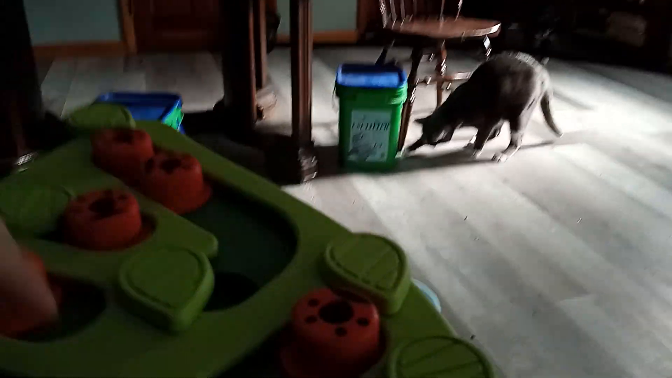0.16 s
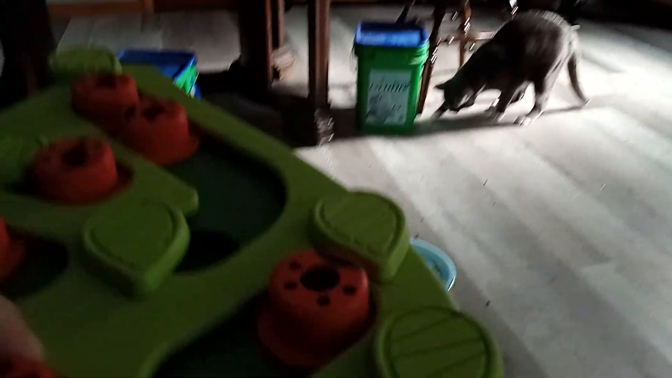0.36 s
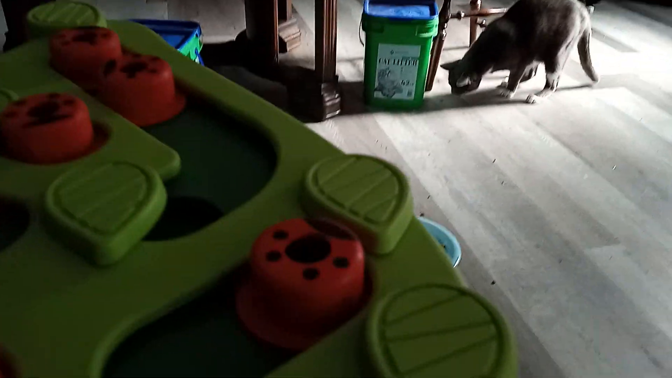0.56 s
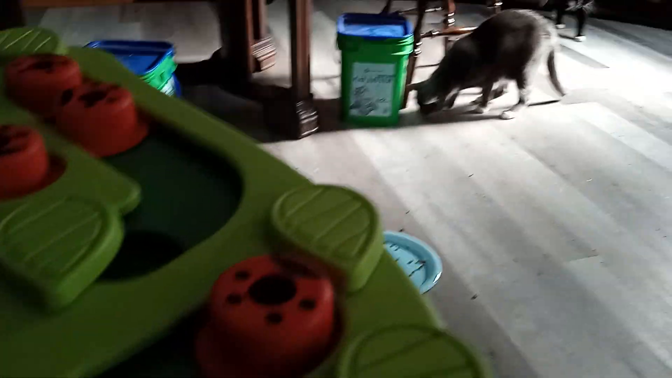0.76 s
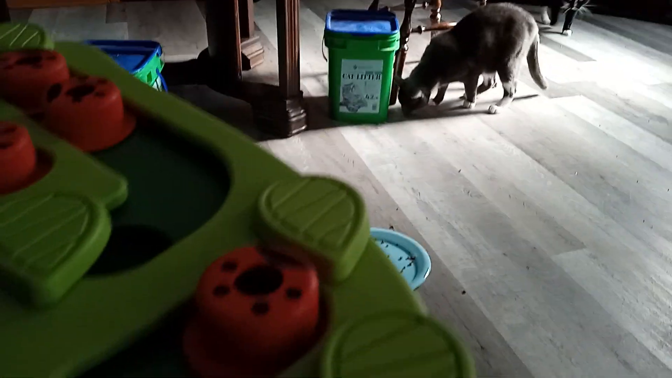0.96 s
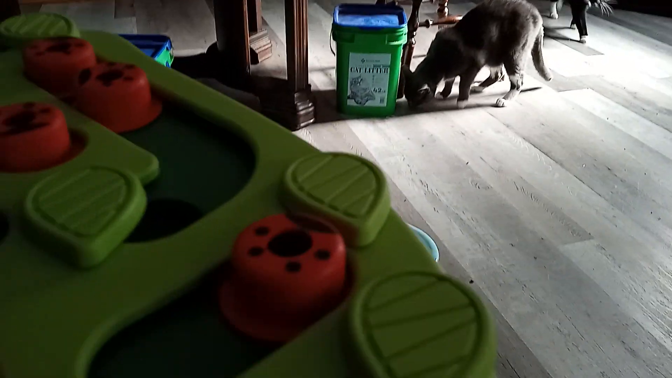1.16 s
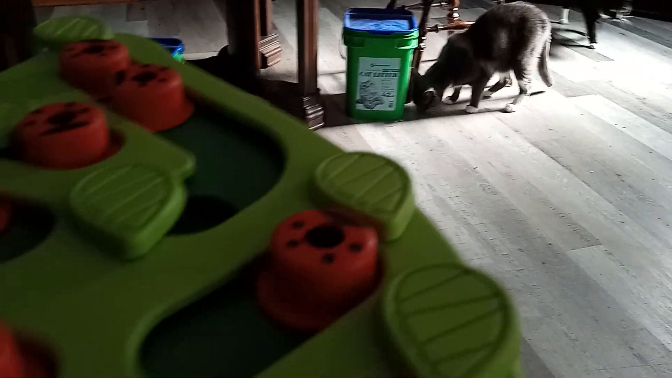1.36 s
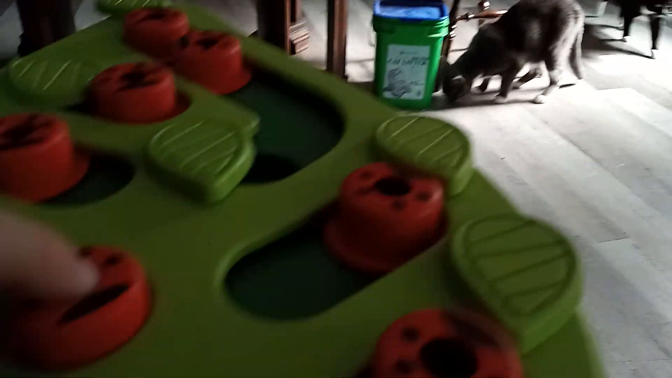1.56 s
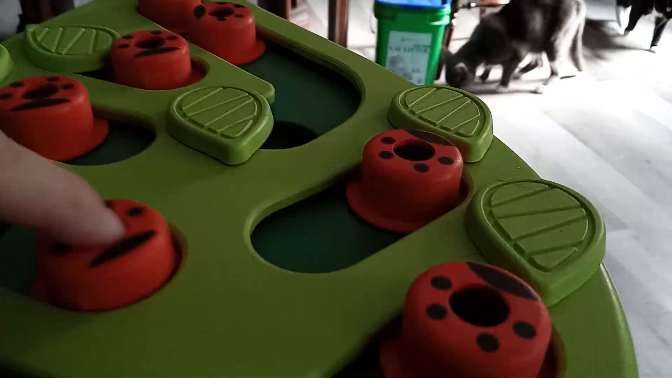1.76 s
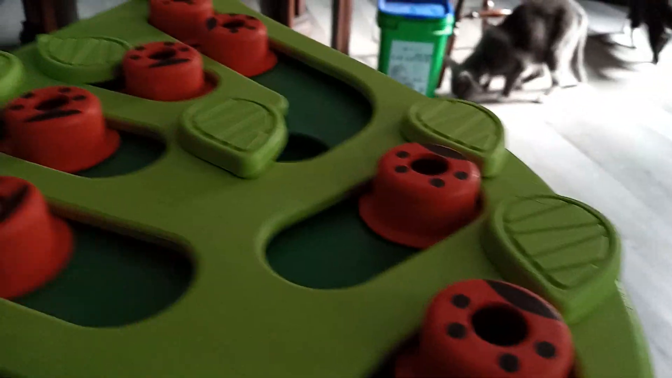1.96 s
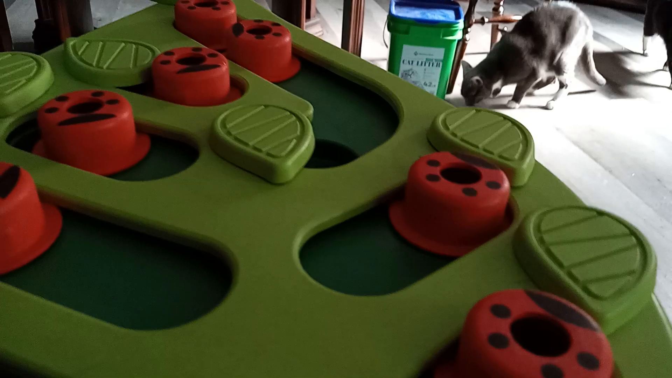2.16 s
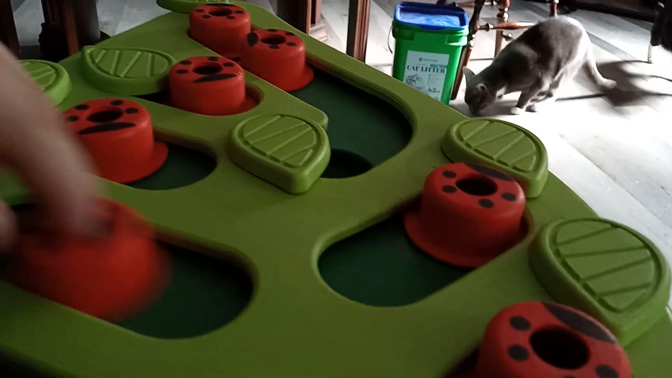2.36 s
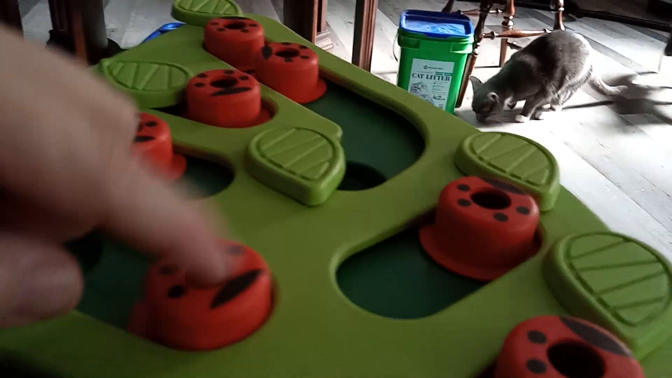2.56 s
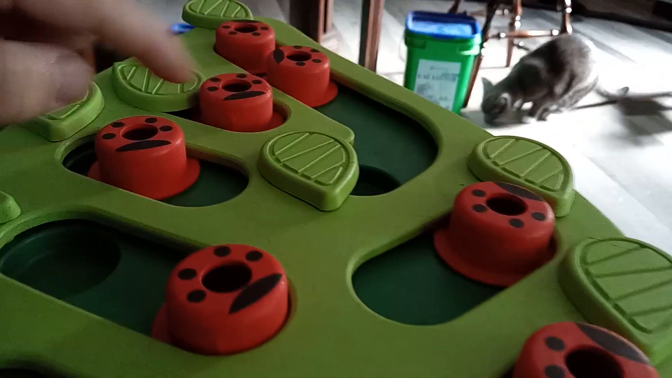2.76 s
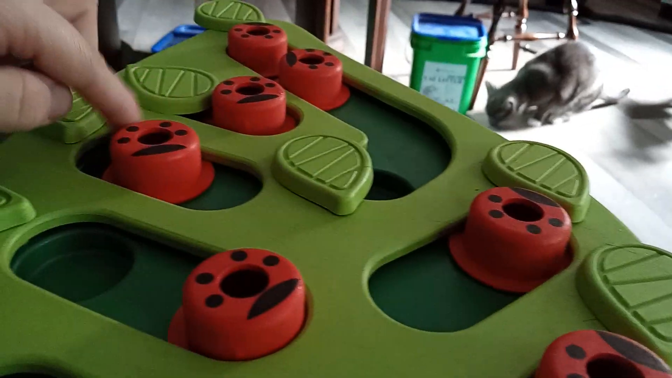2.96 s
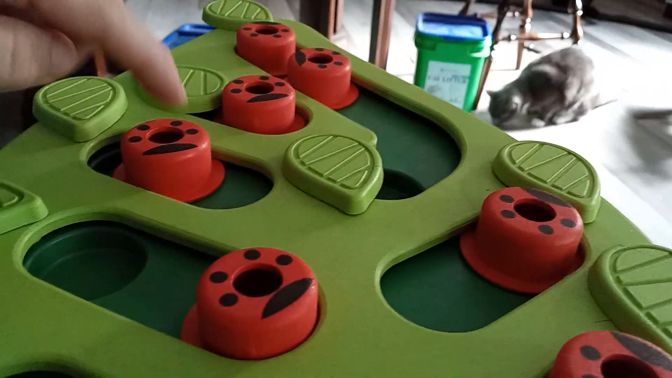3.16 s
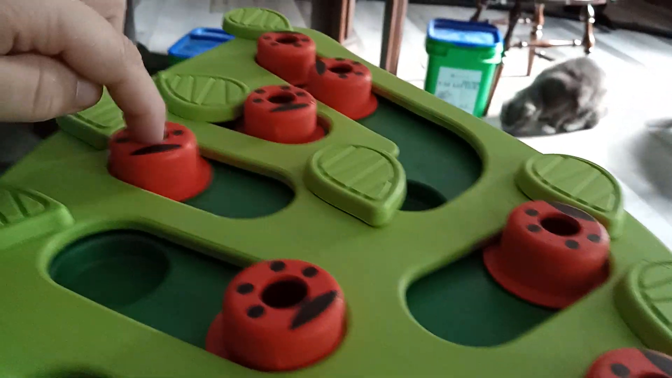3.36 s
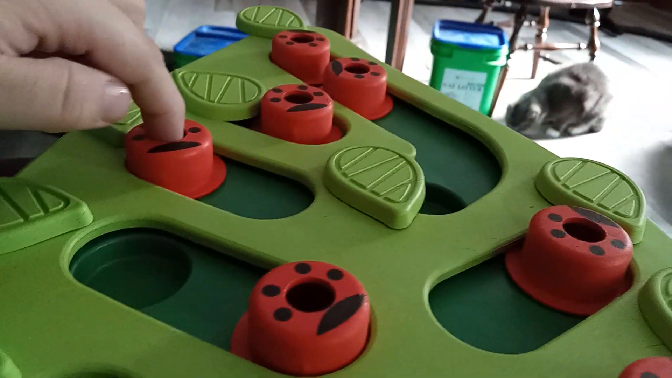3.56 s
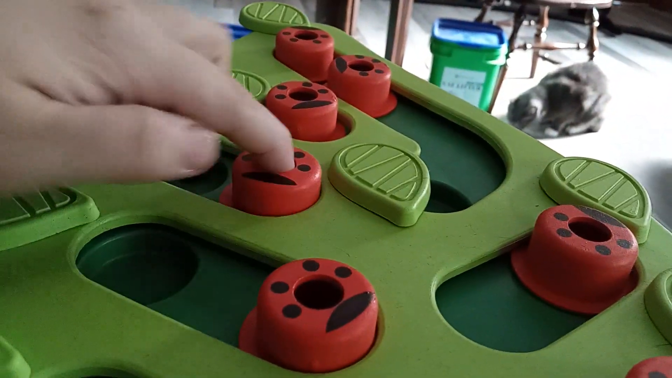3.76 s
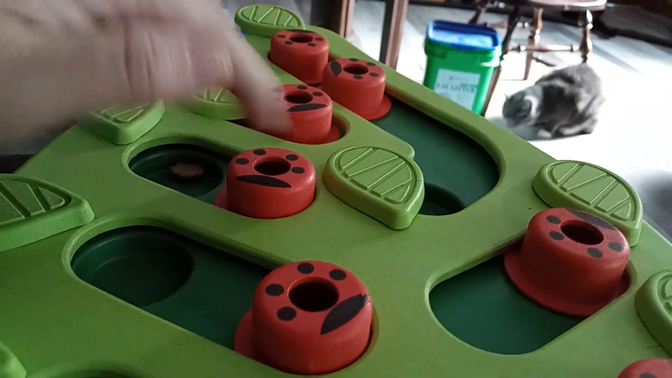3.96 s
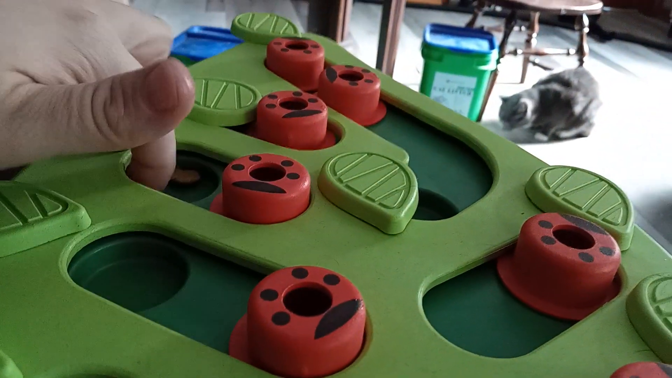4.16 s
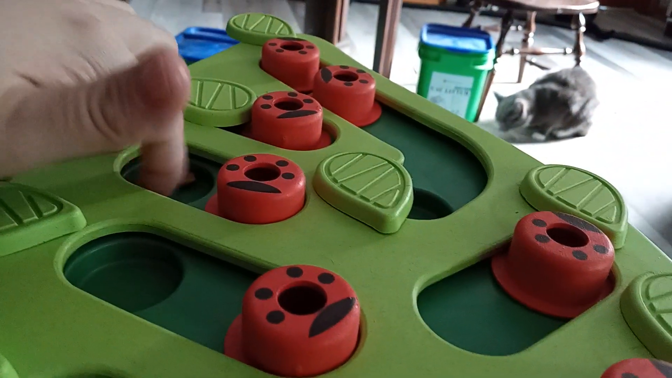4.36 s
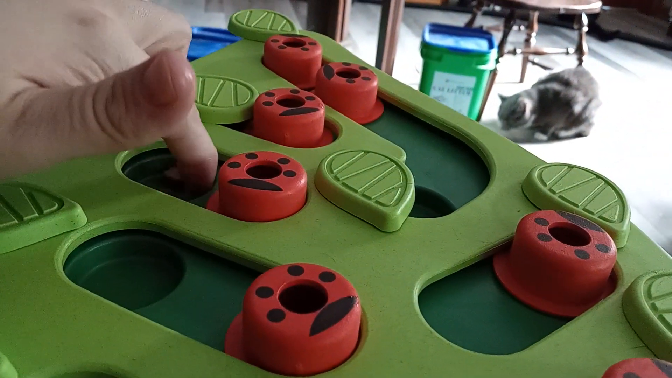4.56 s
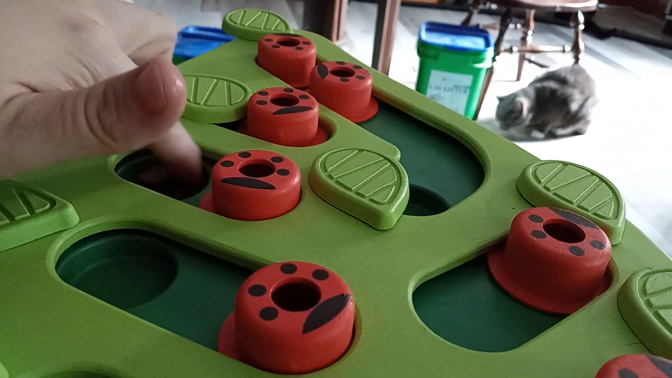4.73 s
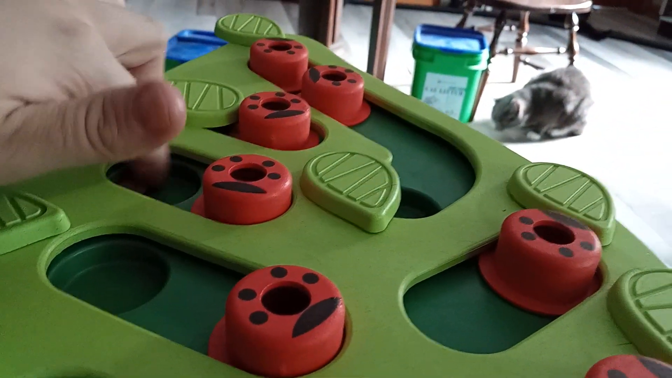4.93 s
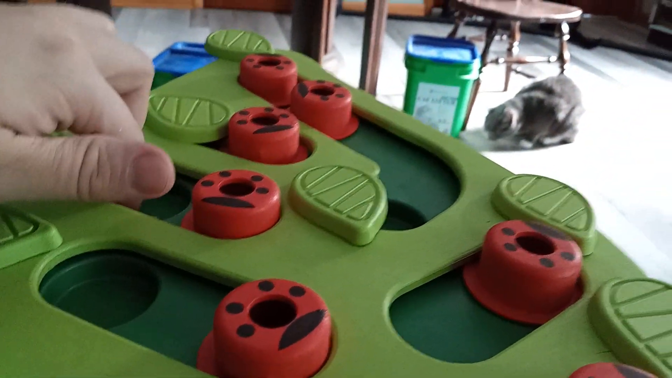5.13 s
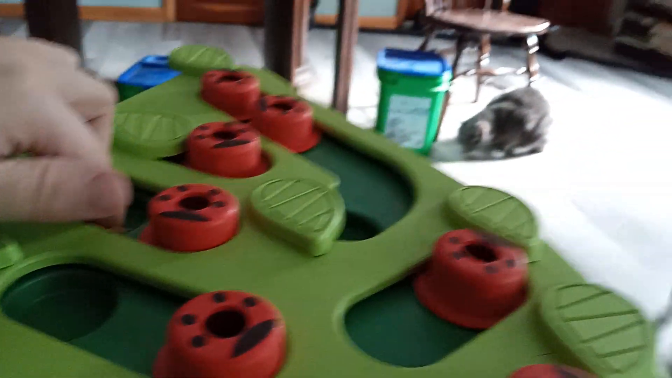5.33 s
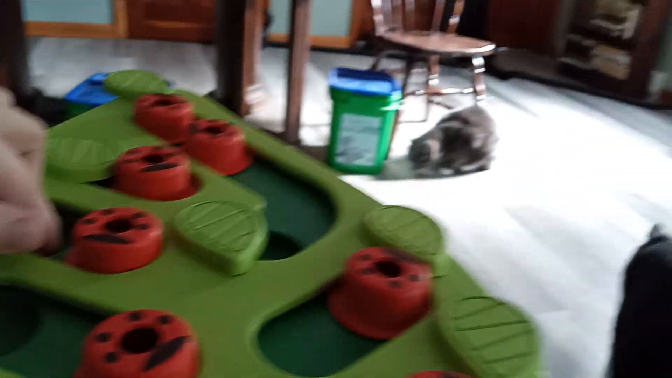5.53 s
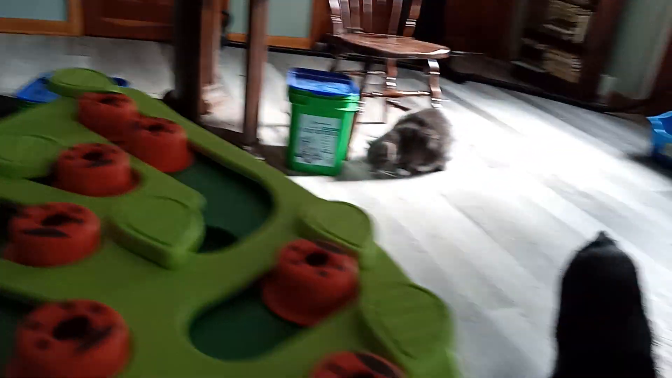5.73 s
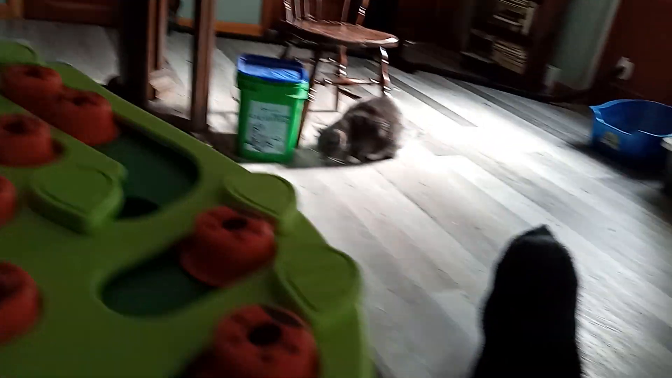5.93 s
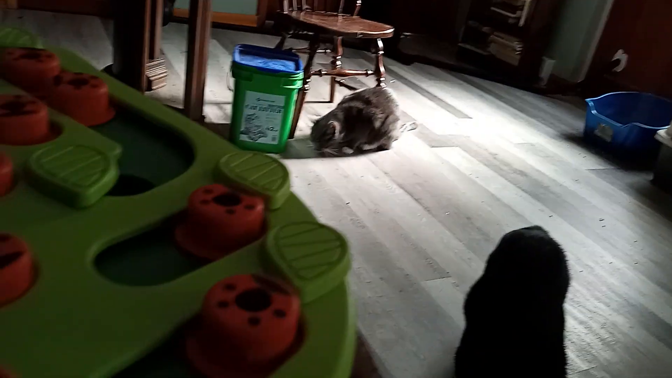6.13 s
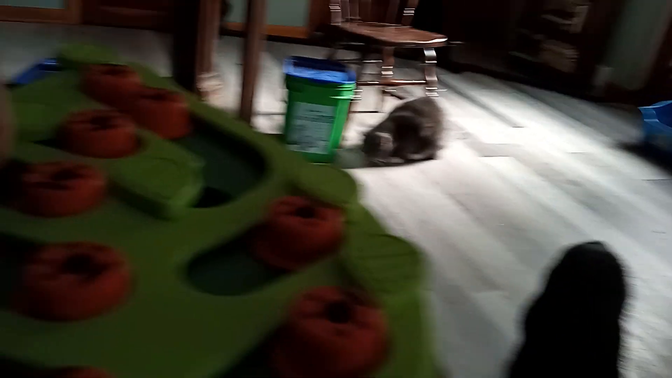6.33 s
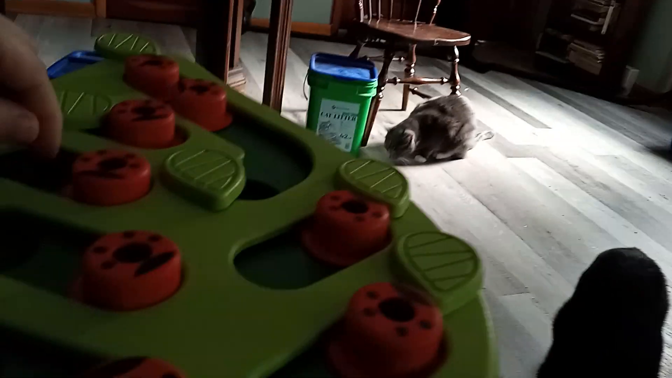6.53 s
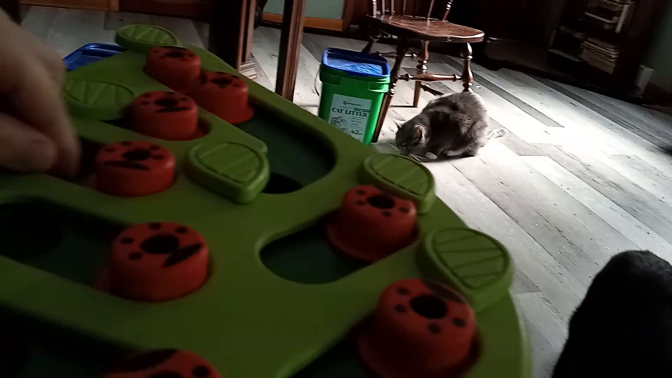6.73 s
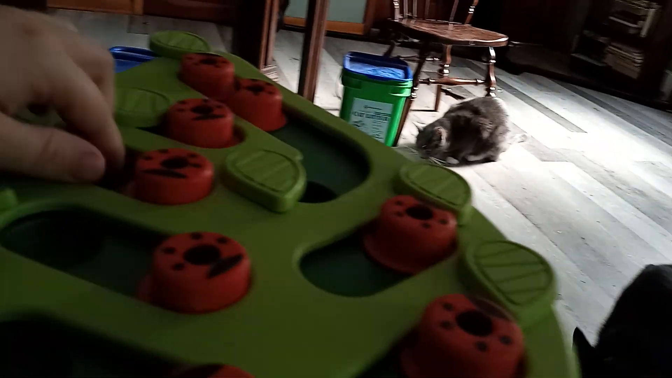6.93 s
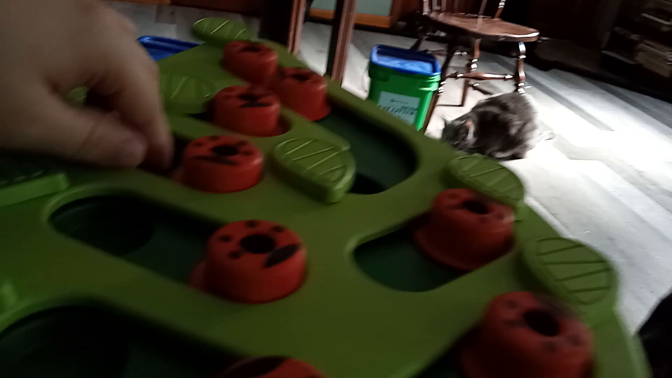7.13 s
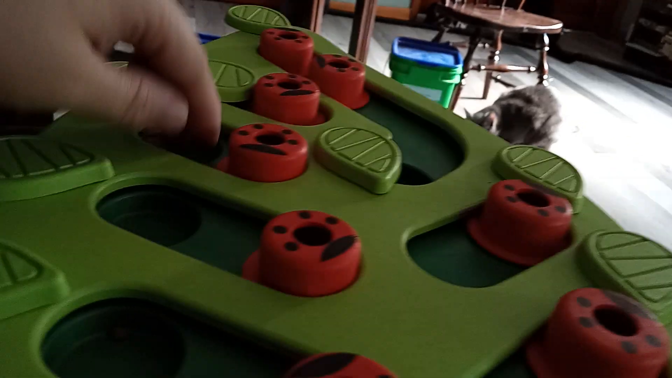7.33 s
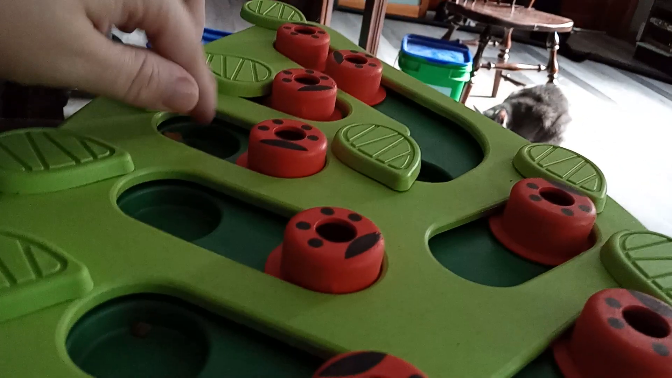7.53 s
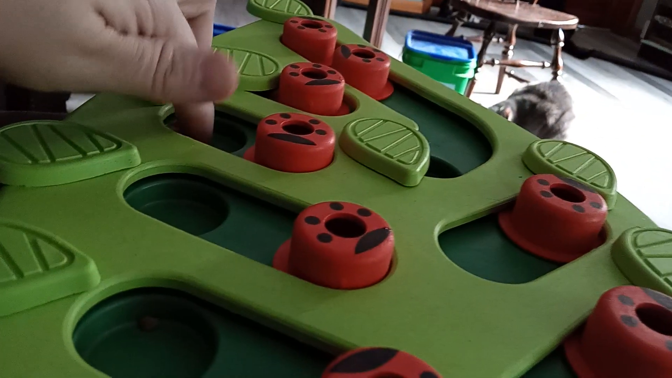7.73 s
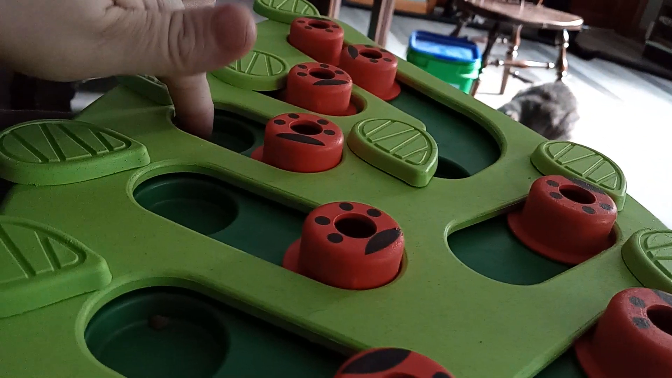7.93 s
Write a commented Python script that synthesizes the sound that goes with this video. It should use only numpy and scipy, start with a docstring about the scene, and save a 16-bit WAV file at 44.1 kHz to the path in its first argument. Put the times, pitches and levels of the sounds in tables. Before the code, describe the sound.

A close stereo microphone in a small room picks up a plastic pet puzzle tray, slightly to the left, over a faint low electrical hum, rumble and hiss. From about 0.4 to 1.5 seconds, light clicks and short scrapes come irregularly, with a sharper clack near 1.0. From 1.55 to 2.7, hollow cups slide more loudly, rasping higher as they speed up and knocking the slot ends, with a hard clack near 2.7. After a near pause come small taps around 3.0, then strong scrapes and rebounding knocks from 3.4 to 4.05. A dull finger thump and brief scrape follow at 4.25. From 4.5 to 5.6, a fingertip rubs softly and drily. It is mostly quiet until 6.5, when a small hard piece ticks and bounces amid rubbing until 6.8. Further rubs, ticks and a light knock occur around 7.0-7.4 and 7.7-7.85, then hum remains until 8.

```python
"""In a small room, close to the microphone and a little to its left, a hand works a pet's plastic puzzle tray.
Hollow cups slide along slots: each push speeds up and slows, scraping by uneven slips under moving filters.
Cups knock the slot ends and rebound, and a finger thumps the tray, as force bursts ring the plastic. Then a
finger rubs, mostly in an uncovered well, where something small and hard, probably a treat, ticks and bounces.
Decaying noise answers as the room, over a low electrical hum, rumble and faint hiss."""
import sys
import numpy as np
from scipy import signal
from scipy.fft import rfft, irfft, next_fast_len
from scipy.io import wavfile
from scipy.ndimage import uniform_filter1d, map_coordinates

SR = 44100
rng = np.random.default_rng(int(sys.argv[2]) if len(sys.argv) > 2 else 0)


def wav_out(sig):
    """Save sig, one row per channel (or a flat mono array), as 16-bit PCM at SR to the path in sys.argv[1]."""
    wavfile.write(sys.argv[1], SR, np.round(np.clip(np.atleast_2d(sig).T, -1, 1) * 32767).astype(np.int16))


N = 352359  # length in samples

# Levels of the four contact tables are taken before the mix in scene().
# Pushes of a cup. Each row: start in seconds, speeding up in seconds, slowing down in seconds,
# level at top speed in dB, swell in dB, bass and treble in dB (a shared offset is added), ring of the cup in Hz.
CUP_PUSHES = [(0.358, 0.025, 0.03, -42.5, 18, -22.5, -15.5, 1180),
              (0.47, 0.038, 0.043, -51.5, 6, -19.5, -4.5, 1130),
              (0.956, 0.021, 0.014, -39, 17.5, -13, -18.5, 1260),
              (1.185, 0.063, 0.036, -45, 15, -7.5, -15.5, 1280),
              (1.335, 0.012, 0.018, -49.5, 9, 3, -25, 1250),
              (1.42, 0.044, 0.042, -52.5, 11, -7.5, -22.5, 875),
              (1.538, 0.021, 0.0072, -46.5, 21, -10, -21, 1030),
              (1.563, 0.038, 0.016, -35, 4.5, -12.5, -17, 1370),
              (1.867, 0.11, 0.13, -29.5, 9, -19, -13.5, 1484),
              (2.083, 0.067, 0.044, -35.5, 3, -22, -15, 1301),
              (2.351, 0.022, 0.05, -31.5, 7, -17.5, -22.5, 1040),
              (2.405, 0.065, 0.14, -31, 13, -23, -9, 1400),
              (2.98, 0.027, 0.027, -65, 8.5, -18, -13.5, 1030),
              (3.044, 0.02, 0.04, -53.5, 7, -19, -13.5, 899.6),
              (3.384, 0.096, 0.014, -29, 9, -28.5, -16, 1540),
              (3.689, 0.024, 0.02, -41.5, 7, -13.5, -25, 941),
              (3.725, 0.1, 0.046, -28.5, 12, -25, -12, 1390),
              (4.255, 0.008, 0.059, -48.5, 12, -8, -10, 1100)]
# Cups hitting the tray, and near 4.25 s a finger thumping it. Each row: time in seconds, level in dB,
# thump in dB, hardness in dB, chatter in dB, ring of the struck spot in Hz,
# flight before the first rebound in seconds (0 for no rebound).
TRAY_KNOCKS = [(0.3809, -42.5, -1.5, 0, 22, 810, 0.002), (0.4959, -46.5, 4, -12, 5, 1160, 0.0025),
               (0.6956, -44.5, 8, 1.5, -6.5, 765, 0.0078), (0.772, -60, 11, -24.5, 5, 1940, 0),
               (0.8125, -48.5, 0, -16, 5.5, 1820, 0.000039), (0.8235, -57, 10, -4, 1.5, 450, 0.00015),
               (0.8707, -35.5, -12, 7.5, -18, 1700, 0.000085), (0.9626, -50, 3, 0.5, -0.5, 1250, 0),
               (0.981, -32, 3, 9, -9.5, 2800, 0.0012), (1.0666, -45, 4, -5, -3, 800, 0.00084),
               (1.1726, -42, 1, 3, -11.5, 3060, 0.0004), (1.2486, -40.5, -3.5, -1, -8, 1240, 0.00046),
               (1.3466, -43.5, 8.5, -3.5, 0, 430, 0), (1.5609, -40, -11.5, 1, -11.5, 1277, 0),
               (1.6114, -29, -3, 10, -4, 2700, 0.0018), (1.8853, -38, -1, -3, 7, 945, 0.00099),
               (1.9485, -31, 0, -12, 10.5, 1235, 0.0021), (1.9754, -33, -2, -7.5, -5.5, 1740, 0.0015),
               (2.1736, -36.5, 4, 5, -1, 1550, 0.013), (2.3333, -32.5, 4.5, -4, -14, 1300, 0),
               (2.3569, -36.5, 4.5, -6, 2.5, 989, 0.00094), (2.6113, -31, -4, 3.5, -4, 2000, 0),
               (2.6363, -34.5, -3, 9.5, 1, 1090, 0.00019), (2.6736, -25.5, -0.5, 6.5, 2.5, 2110, 0.0096),
               (3.012, -52, 1.5, -16, 7.5, 964, 0.0011), (3.0427, -38.5, -9.5, -2.5, -2.5, 1050, 0.00029),
               (3.092, -58.5, -5, 6, -3, 930, 0), (3.3863, -33.5, -1, 8, -11, 1778, 0.0016),
               (3.4772, -27, 1.5, 12.5, 4, 1630, 0.0064), (3.4944, -32.5, 1, 14, -3, 1776, 0.0013),
               (3.6951, -41, -6, -11, -7, 870, 0), (3.7162, -34, 1, 1.5, -3, 1410, 0),
               (3.78, -32, -12, 0, -3.5, 1902, 0.00033), (3.8577, -28, -12.5, -4, 0, 2266, 0.0014),
               (3.8729, -31, 7, 10.5, 15.5, 1200, 0.00016), (3.9416, -50, -5.5, 3.5, -1.5, 897, 0.00044),
               (3.9629, -45.5, -7, 0, 6.5, 2470, 0.000074), (4.0246, -29.5, -14, 13, -8, 1420, 0.00047),
               (4.0274, -29, 3, 9, 8, 1499, 0.022), (4.2477, -43, 20, 24, 1.5, 1830, 0.0012),
               (4.2514, -35.5, 7, -11, 0.5, 300, 0.0008), (4.259, -41.5, 6.5, -7, 6, 1488, 0),
               (7.0452, -34.5, 0.5, 2.5, 2.5, 990, 0), (7.7221, -44.5, -10.5, 8, 4, 722, 0.0019),
               (7.8351, -52, -19, -5, 6, 863, 0.00065)]
# Strokes of the finger, mostly in the well. Each row: start in seconds, speeding up in seconds,
# slowing down in seconds, level at top speed in dB, treble in dB (a shared offset is added).
FINGER_STROKES = [(0.0, 0.033, 0.28, -75.5, 0), (0.325, 0.018, 0.03, -71, 10),
                  (3.347, 0.014, 0.026, -73, 8), (4.457, 0.034, 0.024, -57, 6.5),
                  (4.733, 0.014, 0.057, -58.5, -9), (4.815, 0.028, 0.045, -55.5, -10),
                  (4.938, 0.011, 0.07, -56, -14), (4.97, 0.112, 0.138, -51.5, -3.5),
                  (5.175, 0.027, 0.049, -59, -13), (5.29, 0.02, 0.04, -62.5, -11.5),
                  (5.24, 0.028, 0.035, -51, -10), (5.341, 0.028, 0.044, -55.5, -2.5),
                  (5.464, 0.024, 0.045, -58, -15), (5.549, 0.012, 0.02, -64.5, 5.5),
                  (5.755, 0.01, 0.025, -66.5, -12), (6.05, 0.016, 0.014, -65.5, -7),
                  (6.588, 0.0075, 0.05, -57, 6), (6.645, 0.02, 0.073, -54.5, -4.5),
                  (6.72, 0.019, 0.046, -53, -11), (7.026, 0.02, 0.02, -48, 4),
                  (7.07, 0.043, 0.05, -53.5, -2.5), (7.168, 0.012, 0.024, -46.5, -17),
                  (7.209, 0.066, 0.044, -52.5, -9), (7.352, 0.023, 0.059, -57, -13),
                  (7.735, 0.022, 0.05, -54.5, -3), (7.775, 0.031, 0.017, -54.5, -4)]
# A small hard piece dropping or tipping in the well. Each row: time in seconds, level in dB, thump in dB,
# hardness in dB, ring of the struck spot in Hz, number of bounces, first flight in seconds.
PIECE_TICKS = [(4.7454, -62, -10, -11, 1830, 0, 0), (5.5597, -65.5, -10, 4, 3370, 1, 0.006),
               (5.7174, -62.5, -5, -2, 2750, 1, 0.006), (6.112, -61, 2.5, 7, 3016, 0, 0),
               (6.5411, -40, -4, 5, 1693, 0, 0), (6.5628, -45.5, -14, 13, 3420, 0, 0),
               (6.5764, -40, -13, 8.5, 1780, 2, 0.0093), (6.6465, -54, -5, 16, 1830, 0, 0),
               (6.6603, -49, -3, 0, 1760, 0, 0), (6.725, -50.5, -8, -6.5, 1890, 2, 0.01),
               (6.7918, -57.5, 9, -4, 858.4, 0, 0), (7.0645, -44.5, 10, 9.5, 3397, 0, 0),
               (7.0824, -49, 11, -4, 1779, 0, 0), (7.221, -51, 24, -6, 1816, 0, 0),
               (7.2724, -46.5, 19.5, 13.5, 1960, 1, 0.0076), (7.7471, -46.5, 2.5, 3.5, 1829, 2, 0.0104),
               (7.952, -60.5, -22, -20.5, 1830, 0, 0)]
# Tone of each kind of contact. Each row: frequency in Hz, gain in dB.
SCRAPE_TONE = [(76, -58), (130, -25), (291, -7), (554, -4.5), (625, -2), (1520, -6), (1750, -3), (1970, -5),
               (2220, -6.5), (3910, -15.5), (6470, -24), (8070, -36), (12300, -41), (15100, -32),
               (16000, -38)]
TRAY_KNOCK_TONE = [(150, -10), (250, -10.5), (400, -4), (700, -2), (1200, -1.5), (1800, -3), (2600, -5.5),
                   (3600, -12), (4500, -21.5), (6000, -26), (8000, -44.5), (12000, -51), (15200, -43.5)]
FINGER_TONE = [(300, -18.5), (550, -18.5), (750, -10.5), (1000, -8.5), (1350, -11), (1900, -4.5),
               (2500, -11), (3500, -11), (4500, -20), (5800, -12), (8000, -28), (10000, -22.5),
               (13000, -35.5), (15200, -26)]
PIECE_TONE = [(250, -21), (480, -21.5), (750, -3.5), (1200, -8), (1900, -6), (2500, -1), (3500, -8),
              (4400, -13.5), (5700, -7), (8000, -16.5), (10000, -20), (13000, -31), (15200, -34.5)]
# Resonances of the tray and of the well. Each row: centre in Hz, width in Hz, lift in dB.
TRAY_MODES = [(370, 37, -0.5), (820, 37, 3), (1260, 430, 2), (1797, 52, 3), (2250, 160, 0.5),
              (3520, 220, 0.5), (4180, 690, -4.5), (6000, 300, -4)]
WELL_MODES = [(930, 280, 4.5), (1350, 116, 9), (1797, 340, 9.5), (3600, 500, 1.5), (3960, 240, 5.5),
              (5060, 480, 5.5), (5620, 400, 3.5), (7100, 390, 1.5), (9800, 1300, -4)]
# Stereo lean of the plastic. Each row: frequency in Hz, left minus right in dB.
STEREO_LEAN = [(200, 2), (380, 2.5), (700, 5.5), (1100, 9), (1700, 7), (2700, 10), (4400, 6), (8100, 9),
               (15000, 12)]
# How alike left and right are. Each row: frequency in Hz, likeness (0 to 1).
STEREO_LIKENESS = [(400, 1), (800, .93), (1500, 0.52), (2500, 0.27), (4500, .35), (8000, 0.27)]
# Decay of the room. Each row: frequency in Hz, time to fall 60 dB in seconds.
ROOM_T60 = [(200, 0.73), (530, 0.18), (1400, 0.31), (3700, 0.32), (10000, 0.2345)]
# Strength of the room's answer before its stereo balance. Each row: frequency in Hz, gain in dB.
ROOM_STRENGTH = [(250, -18.5), (700, -10.5), (1200, -14.5), (1800, -16), (2800, -18.5), (5000, -13.5),
                 (12000, -16.5)]
# The hum's slow course before its quick waver and stereo balance. Each row: time in seconds, level in dB.
HUM_LEVEL = [(0.0, -68.5), (1.2, -68.3), (2.4, -67.5), (2.56, -63.7), (3.27, -63), (3.52, -66.5),
             (3.69, -64), (4.38, -62.5), (4.74, -65.5), (5.72, -66.5), (6.12, -71), (6.72, -67.3),
             (6.92, -72), (7.17, -62.3), (7.54, -70.5), (7.79, -61.7), (7.99, -70.5)]
# Spectrum shapes of the low rumble and the still air. Each row: frequency in Hz, relative gain in dB.
RUMBLE_TONE = [(20, -12), (42, -7.5), (58, 11), (72, -2.5), (115, -14.5), (170, -2.5), (300, -47)]
AIR_TONE = [(71, -27), (120, -6.5), (136, -16), (278, -14.5), (580, -26.5), (1790, -30.5), (6110, -36.5),
            (8140, -45.5), (13300, -46.5), (15000, -40.5), (16000, -49)]

FLIGHT_SHRINK = 0.65  # each flight over the one before
CUP_LOSS_DB, TICK_LOSS_DB = 9, 3  # lost at each bounce
# lift of the struck spot's ring for a blow at SPOT_AT_DB, and extra lift for each dB below that
SPOT_DB, SPOT_AT_DB, SPOT_PER_DB = 6.5, -35, 0.04
# a cup at rest against one at top speed: more bass, less treble, a lower ring (as a fraction)
SLOW_BASS_DB, SLOW_TREBLE_DB, SLOW_RING_DROP = 10, -4.5, 0.17
RUB_SWELL_DB, RUB_SLOW_TREBLE_DB = 11.5, -4.5  # top speed over rest; treble at rest
TICK_CHATTER_DB = -4.5
HUM_HZ = 87.6
TOP_HZ = 15900  # band limit of the recorder


def slides(bass_db=14, treble_db=14, cup_db=5.0, cup_width_hz=520):
    """A cup's rim scrapes the slot: slow it grinds low, fast it is louder and brighter, and its hollow rings higher."""
    track = np.zeros((2, N))
    judder_db = 1.6 * wobble(170)
    for start_s, rise_s, fall_s, db, swell_db, bass, treble, cup_hz in CUP_PUSHES:
        gain, slow = stroke(rise_s, fall_s, swell_db, edge_s=0.009)

        def colour(hz, read):
            """Tone and ring of the cup follow its slowness."""
            slowness = read(slow)
            low_db = bass + bass_db + SLOW_BASS_DB * slowness
            high_db = treble + treble_db + SLOW_TREBLE_DB * slowness
            ring_hz = cup_hz * (1 - SLOW_RING_DROP * slowness)
            return tilt(hz, low_db, high_db) + cup_db * bell(hz, ring_hz, cup_width_hz)

        force = friction(len(gain), slips_per_s=1700, spread_db=2.5, smooth=0.5)
        scrape = plastic(force, SCRAPE_TONE, TRAY_MODES)
        scrape = travel(scrape, colour, patchy_db=3.4)
        add(track, start_s, amp(db) * gain * unit(scrape))
    # the rim catches and lets go many times in each push
    return track * amp(judder_db)


def knocks():
    """A cup meets the end of its slot, or a finger thumps the tray; a blow given a flight rebounds twice."""
    blows = []
    for s, db, *colour, flight_s in TRAY_KNOCKS:
        # a cup held down by the finger does not rebound
        count = 2 if flight_s > 0 else 0
        for contact in bounces(s, db, flight_s, CUP_LOSS_DB, count):
            blows.append((*contact, *colour))
    return contacts(blows, TRAY_KNOCK_TONE, TRAY_MODES,
                    ring_t60=0.025, bounce_db=-19, lead_in_db=-13, flex_s=0.00066)


def rubs(treble_db=4):
    """A fingertip drags over the plastic: a thin hiss with small slips in it, brighter when fast."""
    track = np.zeros((2, N))
    judder_db = 1.3 * wobble(170)
    for start_s, rise_s, fall_s, db, treble in FINGER_STROKES:
        gain, slow = stroke(rise_s, fall_s, RUB_SWELL_DB, edge_s=0.003)

        def colour(hz, read):
            """Treble follows the finger's slowness."""
            return tilt(hz, 0, treble + treble_db + RUB_SLOW_TREBLE_DB * read(slow))

        force = friction(len(gain), slips_per_s=320, spread_db=2.5, smooth=0.9)
        rub = travel(plastic(force, FINGER_TONE, WELL_MODES), colour, patchy_db=3.4)
        add(track, start_s, amp(db) * gain * rub)
    return track * amp(judder_db)


def ticks():
    """The small piece loses little at each bounce and rings the walls of the well."""
    blows = []
    for s, db, thump_db, hard_db, ring_hz, number, flight_s in PIECE_TICKS:
        for contact in bounces(s, db, flight_s, TICK_LOSS_DB, count=round(number)):
            blows.append((*contact, thump_db, hard_db, TICK_CHATTER_DB, ring_hz))
    return contacts(blows, PIECE_TONE, WELL_MODES,
                    ring_t60=0.013, bounce_db=-14.0, lead_in_db=-22.5, flex_s=0.00058)


def contacts(blows, tone, modes, ring_t60, bounce_db, lead_in_db, flex_s, ring_share=0.21, size=2048):
    """Faint noise swells just before one sharp push, then a dense quick rattle of the shell and a weak bounce."""
    track = np.zeros((2, N))
    lead = size // 8  # samples kept ahead of the push
    t = (np.arange(size) - lead) / SR
    after = np.maximum(t, 0)

    def burst(shape):
        """Shaped noise of fixed energy."""
        return unit(rng.standard_normal((2, size)) * shape) / np.sqrt(size)

    for s, db, thump_db, hard_db, chatter_db, ring_hz in blows:
        lead_in = burst((t < 0) * np.exp(-np.abs(t) / 0.002))
        # the thin wall flexes, spreading part of the push over a moment
        push = 0.65 * burst((t > 0) * np.exp(-after / flex_s))
        push[[0, 1], [lead, lead + rng.integers(-8, 9)]] += 0.76
        rattle = burst(amp(-60 * after / ring_t60) * (1 - np.exp(-after / 0.0008)))
        force = amp(lead_in_db) * lead_in + push + amp(chatter_db) * rattle
        force[0, lead + int(rng.uniform(0.002, 0.009) * SR)] += amp(bounce_db)
        # the plastic is well damped, so no spot rings out as a tone; lighter blows ring it more purely
        spot_db = min(SPOT_DB + SPOT_PER_DB * (SPOT_AT_DB - db), 11)
        spot = (ring_hz, ring_share * ring_hz, spot_db)
        knock = plastic(force, tone, [*modes, spot], thump_db, hard_db)
        add(track, s - lead / SR, amp(db) * knock)
    return track


def bounces(s, db, flight_s, loss_db, count):
    """Time in seconds and level in dB of a blow and its rebounds, each sooner and weaker than the last."""
    contact_list = [(s, db)]
    for k in range(1, count + 1):
        flown_s = flight_s * sum(FLIGHT_SHRINK ** j for j in range(k))
        contact_list.append((s + flown_s, db - loss_db * k))
    return contact_list


def friction(size, slips_per_s, spread_db, smooth):
    """Force of a rubbed surface: tiny slips of uneven size, so many a second, over a smooth hiss."""
    caught = rng.random(size) < slips_per_s / SR
    slip_size = amp(spread_db * np.minimum(rng.exponential(size=size), 3))
    kicks = caught * slip_size * rng.choice([-1, 1], (2, size))
    return unit(kicks) + smooth * rng.standard_normal((2, size))


def stroke(rise_s, fall_s, swell_db, edge_s):
    """A stroke speeds up and slows: its gain, with soft ends, and its slowness (1 at rest, 0 at top speed)."""
    length_s = rise_s + fall_s
    t = np.arange(0, length_s, 1 / SR)
    slow = 1 - np.cos(np.pi / 2 * np.interp(t, [0, rise_s, length_s], [-1, 0, 1]))
    soft_ends = np.clip(np.minimum(t, length_s - t) / edge_s, 0, 1)
    return amp(-swell_db * slow) * soft_ends, slow


def plastic(force, tone, modes, thump_db=0, hard_db=0):
    """Two force signals ring the plastic in stereo; the shared part is set to unit power in the middle band."""
    length = force.shape[1]
    size = next_fast_len(length + 2048)
    hz = np.fft.rfftfreq(size, 1 / SR)
    peaks_db = sum(lift * bell(hz, centre, width) for centre, width, lift in modes)
    # a small tray radiates little bass
    radiation = hz ** 4 / (hz ** 4 + 190 ** 4)
    gain = amp(along(tone, hz) + tilt(hz, thump_db, hard_db) + peaks_db) * radiation
    # minimum phase: the tray rings only after it is struck
    cepstrum = irfft(np.log(gain + 1e-6), size)
    cepstrum[1:size // 2] *= 2
    cepstrum[size // 2 + 1:] = 0
    shared, apart = rfft(force, size) * np.exp(rfft(cepstrum))
    middle = (hz > 700) & (hz < 2500)
    power = 2 * np.sum(np.abs(shared[middle]) ** 2) / size / length
    # the left microphone port faces the tray; the shadowed right one hears more of its other faces
    alike = np.clip(along(STEREO_LIKENESS, hz), 0, 1)
    lean = amp(along(STEREO_LEAN, hz))
    left = lean * shared
    right = alike * shared + np.sqrt(1 - alike ** 2) * apart
    pair = np.array([left, right]) * 2 / (1 + lean)
    return irfft(pair, size)[:, :length] / np.sqrt(power)


def travel(x, colour_db, patchy_db, size=512):
    """A moving contact: colour_db(Hz, read) shifts with it, and the wall's many small modes come and go."""
    overlap = size * 3 // 4
    padded = np.pad(x, ((0, 0), (0, size)))
    hz, t, z = signal.stft(padded, SR, nperseg=size, noverlap=overlap)

    def read(control):
        """A per-sample control curve at the time of each frame."""
        return np.interp(t * SR, np.arange(len(control)), control)

    patches = rng.standard_normal(z.shape[1:])
    patches = uniform_filter1d(patches, size=3, axis=0)  # over frequency
    patches = uniform_filter1d(patches, size=14, axis=1)  # over time
    z = z * amp(colour_db(hz[:, None], read) + patchy_db * unit(patches))
    return signal.istft(z, SR, nperseg=size, noverlap=overlap)[1][:, :x.shape[1]]


def bell(hz, centre, width):
    """Shape of one resonance, 1 at its centre."""
    return 1 / (1 + (2 * (hz - centre) / width) ** 2)


def tilt(hz, bass_db, treble_db):
    """The dB that bass (thump) and treble (hardness) settings add on either side of the middle band."""
    bass_part = bass_db * along([(350, 0.87), (900, 0)], hz)
    return bass_part + treble_db * along([(1900, 0.034), (4500, 0.99)], hz)


def room(x, delay_s=0.0096, count=32):
    """The walls answer each port separately, with a fresh tail of decaying noise for each stretch."""
    wet = np.zeros((2, N))
    for stretch in np.array_split(np.arange(N), count):
        hz, t, z = signal.stft(rng.standard_normal((2, SR // 2)), SR, nperseg=256)
        decay = amp(-60 * t / along(ROOM_T60, hz)[:, None])
        tail = signal.istft(z * decay, SR, nperseg=256)[1]
        # the answer builds up softly
        tail *= 1 - np.exp(-(np.arange(tail.shape[1]) / SR / delay_s) ** 2)
        tail /= np.linalg.norm(tail[0])
        mono = x[:, stretch].mean(0)[None]
        add(wet, stretch[0] / SR, signal.fftconvolve(mono, tail, axes=1))
    return filtered(wet, lambda hz: amp(along(ROOM_STRENGTH, hz))) * amp([[1], [-1]])


def background():
    """A slightly unsteady electrical hum with a weak octave, a low rumble and faint hiss."""
    t = np.arange(N) / SR
    phase = 2 * np.pi * HUM_HZ * t + 0.04 * wobble(3)
    waver_db = 0.8 * wobble(11)
    hum_db = np.interp(t, *np.transpose(HUM_LEVEL)) + waver_db
    hum = amp(hum_db) * unit(np.sin(phase) + amp(-26.5) * np.sin(2 * phase))
    # noise common to both sides, plus some of each side's own
    rumble_noise = rng.standard_normal(N) + 0.3 * rng.standard_normal((2, N))
    rumble = unit(filtered(rumble_noise, lambda hz: amp(along(RUMBLE_TONE, hz))))
    air_noise = 1.4 * rng.standard_normal(N) + rng.standard_normal((2, N))
    air = unit(filtered(air_noise, lambda hz: amp(along(AIR_TONE, hz))))
    return hum * amp([[-1.6], [1.4]]) + amp(-80.0) * rumble + amp(-77.0) * air


def amp(db):
    """Decibels to gain."""
    return 10 ** (np.asarray(db) / 20)


def unit(x):
    """Scaled to rms 1."""
    return x / np.sqrt(np.mean(x ** 2) + 1e-20)


def along(points, hz):
    """Rows of (Hz, value) read on a log frequency axis."""
    f, v = np.transpose(points)
    return np.interp(np.log(hz + 1), np.log(f + 1), v)


def wobble(rate):
    """A smooth random curve, rate knots a second."""
    knots = rng.standard_normal(int(N * rate / SR) + 4)
    return map_coordinates(knots, [np.arange(N) * rate / SR])


def filtered(x, response):
    """x passed through a response given as a function of Hz."""
    m = next_fast_len(N + SR // 2)
    return irfft(rfft(x, m) * response(np.fft.rfftfreq(m, 1 / SR)), m)[..., :N]


def add(track, s, sound):
    """Mixes a stereo sound into the track at time s in seconds."""
    start = max(round(s * SR), 0)
    part = track[:, start:][:, :sound.shape[1]]
    part += sound[:, :part.shape[1]]


def scene():
    """Everything on the tray, its room and the background."""
    cups = amp(-7) * knocks() + amp(1.12) * slides()
    finger = amp(-9) * ticks() + amp(-3.5) * rubs()
    # the well lies further left than the cups
    leftward = amp([[1], [-3]])
    return cups + leftward * finger + room(cups + finger) + background()


def record(dry):
    """The recorder keeps almost nothing above its band limit."""
    return filtered(dry, lambda hz: 1 / np.sqrt(1 + (hz / TOP_HZ) ** 200))


dry = scene()
out = record(dry)
wav_out(out)
```